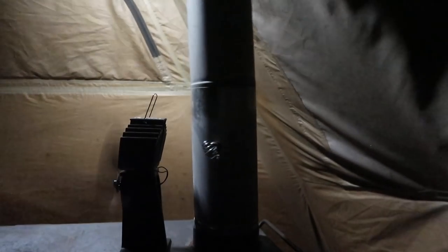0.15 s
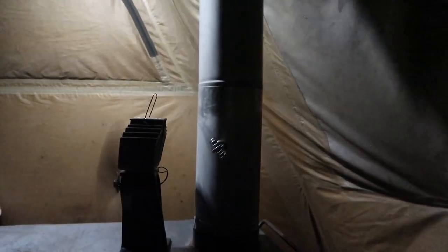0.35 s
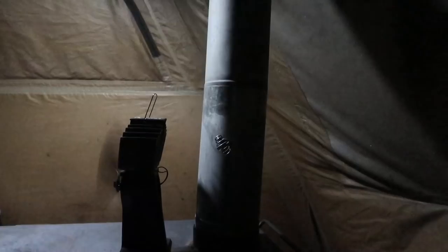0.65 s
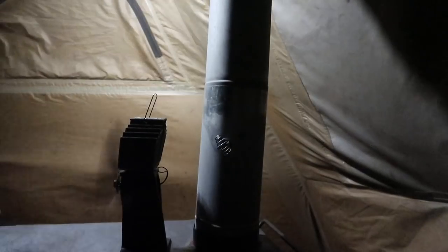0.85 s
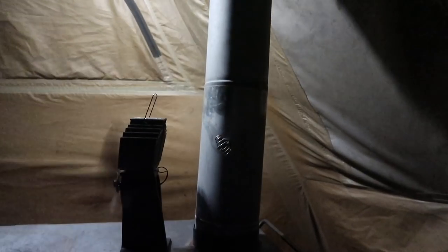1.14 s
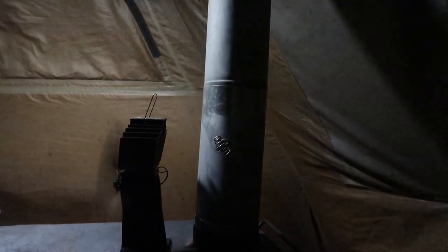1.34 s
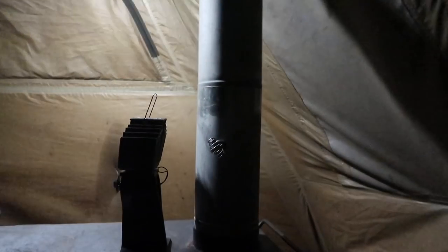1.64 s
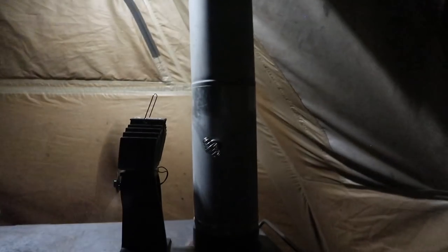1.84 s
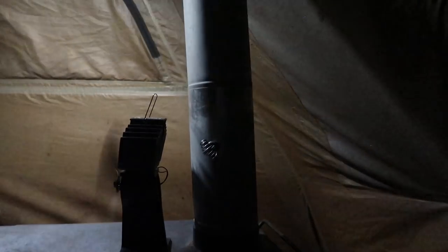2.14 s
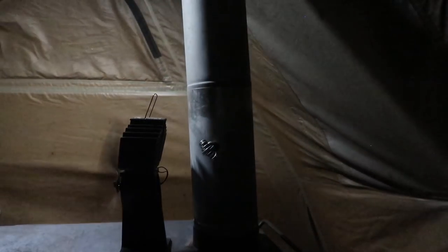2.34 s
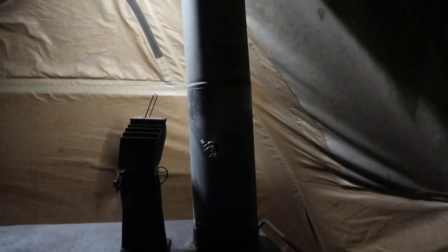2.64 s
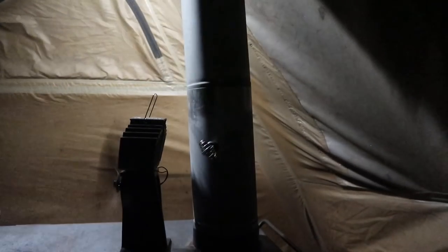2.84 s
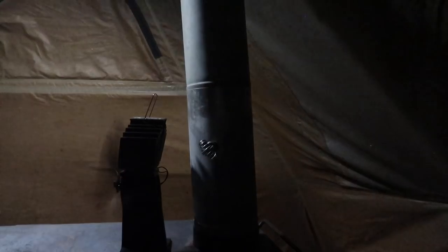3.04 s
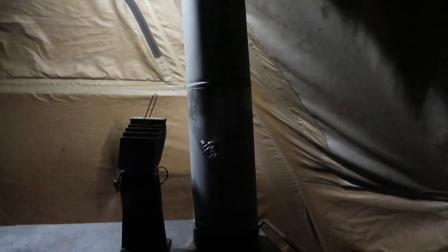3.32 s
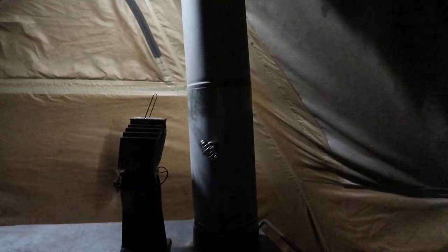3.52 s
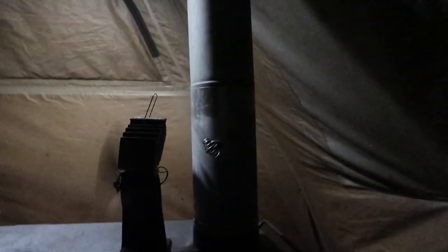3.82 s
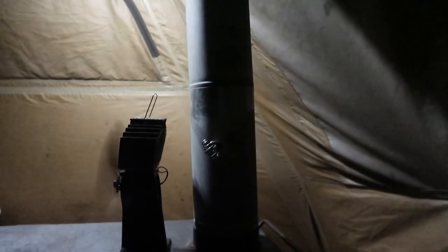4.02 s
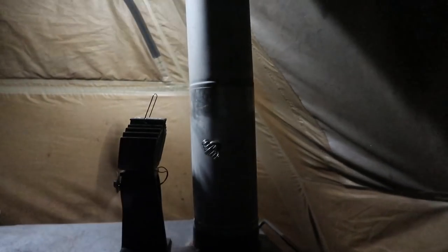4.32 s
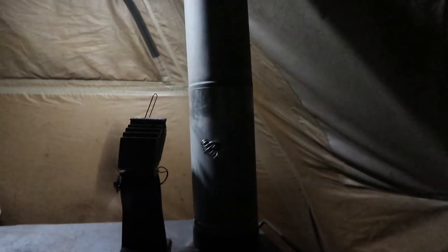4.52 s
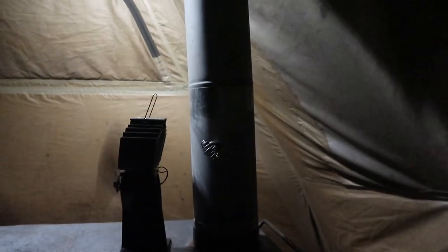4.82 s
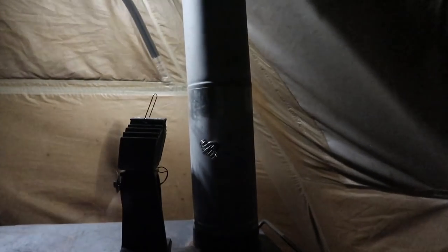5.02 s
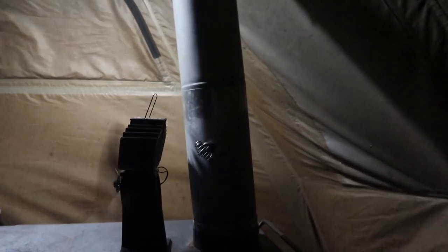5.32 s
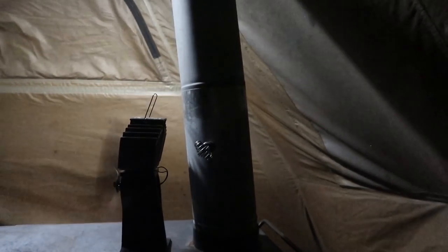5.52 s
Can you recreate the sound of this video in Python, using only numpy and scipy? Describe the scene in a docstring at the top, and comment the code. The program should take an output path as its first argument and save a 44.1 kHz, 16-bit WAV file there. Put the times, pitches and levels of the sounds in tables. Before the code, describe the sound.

Strong gusts shake slack tent cloth: dense flapping and rustling, a lull, then a long rebuilding roar of flutter over soft snow hiss.

```python
"""Canvas tent walls shake in a winter gale, heard from inside.
Countless small slaps make a dense flutter and rustle, and filtered noise makes a low heaving of the air.
Bursts and short swinging tones make slack panels crumple, tick, snap and whump taut.
Ringing modes with a gritty scrape make small metal fittings jingle.
Dense random grains make blown snow hiss over the cloth."""
import sys
import numpy as np
from scipy import signal
from scipy.fft import rfft, irfft, next_fast_len
from scipy.io import wavfile

SR = 44100
rng = np.random.default_rng(int(sys.argv[2]) if len(sys.argv) > 2 else 0)


def dump(signal):
    """Clip the signal to [-1, 1] and save it as 16-bit WAV at the path in sys.argv[1]."""
    limited = np.clip(np.atleast_2d(signal).T, -1, 1)
    pcm = np.round(limited * 32767).astype(np.int16)
    wavfile.write(sys.argv[1], SR, pcm)


N = 249606   # length in samples

# Surges of wind that shake the walls harder: crest_s [s], length_s [s], extra_flutter_db [dB],
# extra_rustle_db [dB], panel_hz [Hz] (resonance of the panel shaken most)
GUST_SURGES = [(0.08, 0.12, 1.5, 2.5, 231), (0.173, 0.17, 6.5, 5, 690), (0.257, 0.1, 2.5, 7.5, 1500),
               (0.422, 0.036, -0.5, 5.5, 1700), (0.843, 0.091, 3, 6, 450), (.97, .081, 1, 5.5, 1700),
               (1.292, .16, -2, 5, 1700), (1.408, 0.25, -3, 4, 1400), (1.523, 0.12, 3.5, 5.5, 181),
               (1.908, 0.15, -1, 5.5, 1750), (2.638, 0.22, 2, 1.5, 182), (2.863, 0.31, 6.5, 1, 300),
               (3.028, 0.11, 10, 2, 660), (3.099, 0.15, 6, 5.5, 214), (3.232, 0.11, 8.5, 1.5, 215),
               (3.643, 0.15, 9.5, 3.5, 307), (3.699, .085, 6, 5.5, 296), (3.779, 0.19, 8, 6, 690),
               (3.972, 0.12, 3.5, 3, 760), (4.053, 0.17, 1, 6, 1700), (4.683, 0.22, 5.5, -1.5, 710),
               (4.912, 0.067, 3.5, 3, 340), (5.046, 0.092, 3, 2, 180), (5.097, 0.08, 5.5, -1.5, 285),
               (5.156, 0.12, 9, 3, 310), (5.256, 0.2, 6, 0, 175), (5.468, 0.16, 6, 4, 272),
               (5.577, .17, 8.5, 4.5, 800)]


def from_db(db):
    """Turn decibels into a gain."""
    return 10 ** (np.asarray(db) / 20)


def rms_one(x):
    """Scale a sound so that its rms strength is 1."""
    return x / np.sqrt(np.mean(x ** 2) + 1e-20)


def in_time(rows):
    """Draw a (time, level) curve as one level for every sample."""
    times_s, levels_db = np.transpose(rows)
    return np.interp(np.arange(N) / SR, times_s, levels_db)


def drift(rate_hz):
    """Smooth random wandering around zero with spread 1, changing about rate_hz times a second."""
    step = 40   # samples between the slow random values
    r = np.exp(-2 * np.pi * rate_hz * step / SR)
    noise = rng.standard_normal(N // step + 2002)
    slow = signal.lfilter([1], [1, -2 * r, r * r], noise)[2000:]   # skip the filter's start
    return np.interp(np.arange(N) / step, np.arange(len(slow)), rms_one(slow))


def colour(x, spectrum):
    """Filter a sound to the given (Hz, dB) response without sounding ahead of time (minimum phase)."""
    size = 2 * next_fast_len(N // 2 + SR // 10)
    hz, db = np.transpose(spectrum)
    bins_hz = np.maximum(np.arange(size // 2 + 1) * SR / size, 1)
    gains = from_db(np.interp(np.log(bins_hz), np.log(hz), db))
    # folding the cepstrum forward in time gives the minimum phase
    cepstrum = irfft(np.log(gains))
    cepstrum[1:size // 2] *= 2
    cepstrum[size // 2 + 1:] = 0
    response = np.exp(rfft(cepstrum))
    return irfft(rfft(x, size) * response)[:N]


def dying(fade_s):
    """A quarter of a second of an envelope that falls by 60 dB in fade_s seconds."""
    return from_db(-60 * np.arange(SR // 4) / (SR * fade_s))


def add(track, s, sound):
    """Mix a sound into a track at s seconds."""
    start = round(s * SR)
    track[start:start + len(sound)] += sound[:N - start]


def swell(crest_s, length_s):
    """A smooth rise to 1 at the crest and a smooth fall, at every sample."""
    rise_share = 0.47   # part of the length spent rising
    start_s = crest_s - rise_share * length_s
    end_s = crest_s + (1 - rise_share) * length_s
    ramp = np.interp(np.arange(N) / SR, [start_s, crest_s, end_s], [0, 1, 0])
    return np.sin(np.pi / 2 * ramp) ** 2


def swells(rows):
    """Add up many swells, giving one track in dB for each level column."""
    return sum(np.outer(extra_db, swell(crest_s, length_s)) for crest_s, length_s, *extra_db in rows)


def slaps(per_s, spread_db):
    """Random pushes of uneven size and either sign, about per_s a second; rms 1."""
    sizes = from_db(spread_db * np.minimum(rng.exponential(1, N), 3.5)) * rng.choice([-1, 1], N)
    happens = rng.random(N) < per_s / SR
    return rms_one(sizes * happens / np.sqrt(per_s))


def patches(pushes, low_hz, high_hz, cycles, count):
    """Each push sets one of many cloth patches ringing, falling 60 dB in some cycles of its pitch; rms 1."""
    out, dealt = np.zeros(N), rng.integers(0, count, N)
    for k, hz in enumerate(np.geomspace(low_hz, high_hz, count)):
        r, w = from_db(-60 * hz / (cycles * SR)), 2 * np.pi * hz / SR
        pushed = pushes * (dealt == k) + 1e-18
        ringing = signal.lfilter([1, 0, -1], [1, -2 * r * np.cos(w), r * r], pushed)
        out += rms_one(ringing) * np.sqrt(hz)   # equal power per Hz
    return rms_one(out)


def walls(flutter_db, rustle_db):
    """Ripples run through the cloth as countless small slaps, more of them in a stronger wind."""
    # Tone of the flutter: pitch_hz [Hz], level_db [relative dB per Hz]
    flutter_tone = [(50, -13), (120, -15.5), (185, 1.5), (270, 0.5), (340, -3), (440, 2), (520, -2),
                    (600, -1.5), (750, -5), (950, -7), (1400, -13.5), (2500, -27), (5000, -52.5),
                    (15000, -88)]
    # Tone of the rustle: pitch_hz [Hz], level_db [relative dB per Hz]
    rustle_tone = [(300, -16.5), (800, 4.5), (1400, 2), (2000, -1), (2900, -7), (3800, -14), (5500, -20.5),
                   (8000, -28.5), (11000, -35.5), (15000, -65)]
    pace = from_db(.35 * (flutter_db - np.max(flutter_db)))
    flapping = drift(31.0)   # quick, uneven rises and dips in level

    folds = slaps(850 * pace, spread_db=-1.0)
    panel_slaps = slaps(1100 * pace, spread_db=1.5)
    panels = patches(panel_slaps, low_hz=158.4, high_hz=1558, cycles=38.0, count=24)
    dry_slaps = rms_one(colour(folds + .5 * rng.standard_normal(N), flutter_tone))
    ringing = rms_one(colour(panels, flutter_tone))
    body = shaken_panels(rms_one(dry_slaps + 0.73 * ringing))

    crease_slaps = slaps(1300 * pace, spread_db=2.5)
    creases = patches(crease_slaps, low_hz=900, high_hz=5000, cycles=72, count=20)
    rubbing = 1.56 * rng.standard_normal(N)
    rustle = rms_one(colour(0.95 * folds + 0.68 * creases + rubbing, rustle_tone))

    moving_flutter_db = flutter_db + 1.2 * flapping
    moving_rustle_db = rustle_db + 1.2 * flapping + 0.1 * drift(46)
    return body * from_db(moving_flutter_db) + rustle * from_db(moving_rustle_db)


def shaken_panels(flutter):
    """Each surge shakes one panel most, so the resonance in the flutter moves from surge to surge."""
    gain, width_octaves = 0.55, 0.24
    edges = 2 ** (width_octaves * np.array([-.5, .5]))
    resonance = np.zeros(N)
    for crest_s, length_s, _, _, panel_hz in GUST_SURGES:
        band = signal.butter(1, panel_hz * edges, "band", fs=SR, output="sos")
        resonance += signal.sosfilt(band, flutter) * swell(crest_s, length_s)
    return flutter + gain * resonance


def heaving(heave_db):
    """Whole walls pump the air in the tent, heard as low noise that is deeper in the later gusts."""
    # Tone of the pumped air: pitch_hz [Hz], level_db [relative dB per Hz]
    heave_tone = [(12, -18), (25, -5), (45, -1.5), (85, 2.5), (130, 0), (200, -4.5), (400, -15),
                  (1000, -99)]
    # Level of the deepest part over time: time_s [s], extra_db [dB]
    deep_curve = [(0, -8), (.8, -5), (1.6, -1), (3.0, 0.5), (4.2, 0.5), (4.7, 3), (5.66, 0.5)]
    air = rms_one(colour(rng.standard_normal(N), heave_tone))
    deep = signal.sosfilt(signal.butter(1, 50, fs=SR, output="sos"), air)   # below about 50 Hz
    extra_deep = deep * (from_db(in_time(deep_curve)) - 1)
    return (air + extra_deep) * from_db(heave_db)


def snaps():
    """A fold cracks open as a very short noise burst and the cloth around it shivers on."""
    # Folds cracking open: start_s [s], level_db [relative dB], low_hz [Hz], high_hz [Hz],
    # fade_s [s for the shiver to fall 60 dB]
    snap_rows = [(.547, -28, 400, 2500, 0.12), (.5685, -8, 1390, 8050, 0.026),
                 (.5907, -12, 1410, 5000, 0.025), (.6227, -13.5, 2000, 8000, .05),
                 (.650, -13, 1500, 5000, 0.026), (1.078, -22, 900, 5000, 0.09),
                 (1.351, -26.5, 610, 1700, 0.04), (1.613, -25, 4700, 6100, 0.048),
                 (1.655, -31, 497, 1710, 0.062), (1.7445, -17.5, 2000, 6200, 0.065),
                 (1.947, -0.5, 3630, 7600, 0.014), (1.950, -12, 1100, 3250, 0.032),
                 (1.971, -18.5, 696, 2430, 0.044), (5.628, -22, 2800, 6800, 0.027)]
    # Tone filter of all cracks: pitch_hz [Hz], gain_db [dB]
    crack_tone = [(100, -73), (500, 26), (3000, 4.5), (4500, -7), (6500, -3), (9000, -9.5), (11500, -7.5),
                  (15000, -36)]
    out = np.zeros(N)
    for start_s, level_db, low_hz, high_hz, fade_s in snap_rows:
        envelope = dying(.024) + .5 * dying(fade_s)   # the crack, then the shiver
        band = signal.butter(2, [low_hz, high_hz], "band", fs=SR, output="sos")
        # soft cloth makes no sharper edge
        softness = signal.butter(4, min(2.9 * high_hz, SR / 2.2), fs=SR, output="sos")
        noise = rng.choice([-1, 1], len(envelope)) * envelope
        burst = rms_one(signal.sosfilt(np.vstack([band, softness]), noise))
        add(out, start_s, from_db(level_db - 9.0) * burst * np.sqrt(np.mean(envelope ** 2)))
    return colour(out, crack_tone)


def crumples():
    """Slack cloth gathers and lets go in dry cracks and briefly ringing creases that swell and fade."""
    # Bouts of crumpling: crest_s [s], level_db [dB at the crest], rise_s [s],
    # fade_s [s to fall 60 dB]
    crumple_rows = [(.425, -28, 0.042, 0.069), (.575, -24, 0.051, 0.54), (1.08, -36.5, 0.047, 0.1),
                    (1.753, -23.5, 0.013, 0.059), (1.953, -27, 0.051, 0.51), (2.065, -50, 0.025, 0.33),
                    (3.94, -28, .012, 0.25)]
    # Tone of the crackle: pitch_hz [Hz], level_db [relative dB per Hz]
    crumple_tone = [(200, -24), (500, -2), (1000, 2.5), (3000, -1.5), (4500, -8), (7000, -13.5),
                    (10000, -20), (14000, -39)]
    t, envelope = np.arange(N) / SR, np.zeros(N)
    for crest_s, level_db, rise_s, fade_s in crumple_rows:
        rise = np.interp(t, [crest_s - rise_s, crest_s], [0, 1])
        fall_db = 60 * np.maximum(t - crest_s, 0) / fade_s
        envelope += rise * from_db(level_db - fall_db)
    creases = patches(slaps(900, spread_db=3.0), low_hz=500, high_hz=6000, cycles=13, count=18)
    cracks = slaps(910, spread_db=3.5)
    crackle = (cracks + 0.52 * creases) * from_db(2.0 * drift(90))   # in uneven bunches
    return rms_one(colour(crackle, crumple_tone)) * envelope


def whumps(sag, rough, soft_hz=2500):
    """A panel pulled taut swings unevenly, then dies and sinks in pitch as the pull eases."""
    # Panels jerking taut: start_s [s], level_db [relative dB], pitch_hz [Hz],
    # hold_s [s at full strength], fade_s [s to fall 60 dB]
    whump_rows = [(0.4, -17, 447, 0.0027, 0.033), (.546, -16, 426, .003, 0.023),
                  (0.558, -11, 410, 0.0022, 0.041), (0.634, -15.5, 564, 0.0073, 0.05),
                  (0.6502, 0, 690, 0.002, 0.003), (0.658, -13.5, 560, 0.012, .05),
                  (0.954, -23, 524, 0.0016, 0.041), (1.074, -17.5, 388, .002, 0.086),
                  (1.35, -17, 594, 0.0015, 0.021), (1.481, -14, 610, 0.0027, 0.046),
                  (1.743, -13.5, 500, 0.0016, 0.022), (1.765, -11.5, 460, 0.0025, 0.038),
                  (1.95, -9.5, 575, .002, 0.032), (1.967, -8, 595, 0.0077, 0.022),
                  (2.98, -19.5, 475, .002, .04), (3.008, -17, 520, 0.0018, 0.024),
                  (3.221, -5, 414, 0.00061, .012), (3.935, -17, 757, 0.0049, 0.046),
                  (4.195, -18, 590, .002, 0.057), (4.627, -10, 540, .003, .04),
                  (4.895, -16, 380, .002, .04), (5.564, -14, 563, 0.0055, 0.042)]
    out = np.zeros(N)
    for start_s, level_db, pitch_hz, hold_s, fade_s in whump_rows:
        envelope = np.concatenate([np.ones(round(hold_s * SR)), dying(fade_s)])
        slow = signal.butter(2, pitch_hz, fs=SR, output="sos")
        shiver = rms_one(signal.sosfilt(slow, rng.standard_normal(SR // 2)))[:len(envelope)]
        moving_hz = pitch_hz * (1 + sag * (envelope - .5) + rough * shiver)
        swing = np.sin(2 * np.pi * np.cumsum(moving_hz) / SR)
        add(out, start_s, from_db(level_db - 1.5) * envelope * swing)
    return signal.sosfilt(signal.butter(2, soft_hz, fs=SR, output="sos"), out)


def ticks(rustle_db):
    """A stiff crease pops through: one pop and a very short shiver in a band with steep edges."""
    # Single dry ticks: start_s [s], level_db [relative dB], low_hz [Hz], high_hz [Hz]
    tick_rows = [(0.525, -20, 2040, 2750), (1.847, -17.5, 1500, 2970), (1.882, -9, 1010, 2640),
                 (1.897, -14, 2210, 3320), (1.924, -17, 2600, 3650), (2.279, -25, 700, 3300),
                 (2.827, -14, 900, 4320), (3.1853, -12.5, 1610, 4200), (3.220, -9.5, 900, 3060),
                 (4.7283, -17.5, 1900, 4260), (5.453, -16.5, 1500, 3000)]
    out, envelope = np.zeros(N), dying(.018)[:SR // 16]
    pop = 7.3 * signal.unit_impulse(len(envelope))   # over the shiver that follows it
    for start_s, level_db, low_hz, high_hz in tick_rows + stray_ticks(rustle_db):
        band = signal.butter(8, [low_hz, high_hz], "band", fs=SR, output="sos")
        dulling = signal.butter(1, 1.5 * low_hz, fs=SR, output="sos")
        push = rng.choice([-1, 1], len(envelope)) * envelope + pop
        burst = rms_one(signal.sosfilt(np.vstack([band, dulling]), push))
        add(out, start_s, from_db(level_db - 4.5) * burst * np.sqrt(np.mean(envelope ** 2)))
    return out


def stray_ticks(rustle_db):
    """Small creases pop at random moments, harder when the cloth rustles harder; rows as in ticks()."""
    count = 110
    moments = rng.integers(0, N, count)
    chance = np.clip(rng.standard_normal((count, 2)), -2, 2)
    octaves = 0.485 * chance[:, 1]   # scatter in pitch
    # scattered in level, and slightly louder with pitch (2 dB per octave)
    levels_db = rustle_db[moments] - 2 - 2 * chance[:, 0] + 2 * octaves
    lows_hz = 1500 * 2 ** octaves
    return [(at / SR, db, hz, 1.99 * hz) for at, db, hz in zip(moments, levels_db, lows_hz)]


def fittings(scatter_db=3):
    """Each knock scrapes grittily and rings the metal, some modes most, with new strengths at each ear."""
    # Ringing modes of the metal: pitch_hz [Hz], level_db [relative dB], fade_s [s to fall 60 dB]
    metal_modes = [(2820, -15, .07), (3460, -30, 0.07), (4060, -14, .06), (6000, -16, .06),
                   (6370, -21, .06), (6800, -19, 0.053), (7080, -17, 0.029), (7640, -19, 0.053),
                   (7900, -17, .04), (10600, -29, .05)]
    # Knocks: start_s [s], scrape_db [relative dB], ring_db [relative dB],
    # struck_hz [Hz around which modes ring hardest]
    knock_rows = [(.45, -36, -34, 6900), (0.559, -31, -25, 6800), (.570, -26, -22, 6300),
                  (0.59, -21, -19, 6750), (.624, -35, -27, 6750), (0.651, -21, -29, 8000),
                  (.676, -36, -29, 4060), (.6994, -45, -30, 6950), (.727, -43, -34, 6500),
                  (1.948, -28.5, -29, 7300), (2.0088, -32.5, -23, 7100), (2.0287, -25, -29, 7700),
                  (2.046, -35, -37, 7100), (2.0596, -28, -32, 3450), (2.0855, -32, -39, 7300),
                  (3.951, -37, -25, 6800), (3.973, -37.5, -30, 6940)]
    # Tone filter of metal scraping on metal and cloth: pitch_hz [Hz], gain_db [dB]
    scrape_tone = [(1500, -41), (3300, 2), (4600, 3), (5500, -11), (7200, -2), (8300, -8), (10500, -17),
                   (14000, -38), (15500, -45)]
    focus_peak_db, focus_octaves = 14.5, .07   # how much harder those modes ring, and how far around
    t = np.arange(SR // 4) / SR
    scrape_fade = dying(0.026) + 0.38 * dying(0.22)   # a short scrape with a weaker tail
    ears = []
    for _ in range(2):
        ring, scrape = np.zeros(N), np.zeros(N)
        for start_s, scrape_db, ring_db, struck_hz in knock_rows:
            for hz, mode_db, fade_s in metal_modes:
                size, phase = rng.standard_normal(2)
                distance = np.log2(hz / struck_hz) / focus_octaves
                focus_db = focus_peak_db * np.exp(-distance ** 2)
                strength = from_db(ring_db + mode_db + focus_db + scatter_db * size)
                envelope = strength * (dying(fade_s) - dying(0.0038))   # the second part softens the start
                add(ring, start_s, envelope * np.sin(2 * np.pi * hz * t + phase))
            add(scrape, start_s, from_db(scrape_db) * scrape_fade)
        grit = slaps(3500, spread_db=2.0)
        ears.append(ring + colour(scrape * grit, scrape_tone))
    return np.array(ears)


def snow(snow_db, centre_ceiling_db=-46):
    """Fine grains sweep the cloth: an even hiss ahead, and a wide one with brief, strong rises."""
    # Tone filter of the hiss ahead: pitch_hz [Hz], gain_db [dB]
    centre_tone = [(1000, -36), (3000, 8), (5000, 6), (8000, -0.5), (11000, -5), (13000, -16), (15000, -55)]
    # Tone filter of the wide hiss: pitch_hz [Hz], gain_db [dB]
    wide_tone = [(1000, -47), (2400, 2), (3400, 5.5), (5000, 3), (8000, 2), (11000, 0.5), (13500, -3),
                 (15500, -15)]
    centre_db = np.minimum(snow_db, centre_ceiling_db) + 4.0
    centre = colour(slaps(30000, spread_db=5.0), centre_tone) * from_db(centre_db)
    wide = colour(slaps(30000, spread_db=-5.0), wide_tone) * from_db(snow_db + 3.5)
    return centre + wide * [[1], [-1]]   # opposite signs at the two ears


def reflections(x, fade_s, first_s):
    """Short, dense echoes between the cloth walls, as a fading noise tail of unit power."""
    tail = rng.standard_normal(SR // 4) * dying(fade_s)
    tail[:round(first_s * SR)] = 0
    return signal.fftconvolve(x, tail / np.linalg.norm(tail))[:N]


def spread(cloth):
    """The nearest walls reach the two ears unequally, and the cloth leans a little to the right."""
    # How much of the cloth's sound differs between the ears: pitch_hz [Hz], side_db [dB]
    width_curve = [(50, -46), (100, -82), (250, -26), (450, -24.5), (800, -24), (1300, -27.5), (2500, -18),
                   (5000, -5), (10000, 3)]
    side = colour(reflections(cloth, fade_s=0.045, first_s=0.000827), width_curve)
    above_bass = signal.sosfilt(signal.butter(1, 340, "high", fs=SR, output="sos"), cloth)
    side = side - .04 * above_bass   # quieter at the left, louder at the right
    return cloth + side * [[1], [-1]]


def scene():
    """One wind drives cloth, air and snow; the cloth lies a little right of the middle, snow all around."""
    # Strength of the wind, as the basic level of the flutter: time_s [s], level_db [dB]
    wind_curve = [(0, -19), (.38, -21.5), (.48, -27), (.65, -24), (.74, -34.5), (1.2, -31), (1.35, -26),
                  (1.66, -27.5), (1.96, -23.5), (2.07, -38), (2.36, -38), (2.76, -33), (3.08, -28.5),
                  (3.5, -25), (3.82, -22.5), (4.27, -28), (4.52, -24), (5.66, -23)]
    # A whole wall bellies in and out, or is held still: crest_s [s], length_s [s],
    # extra_heave_db [dB], extra_flutter_db [dB]
    billow_rows = [(.25, .48, -1, 0), (.64, 0.08, 0.5, -7.5), (.78, 0.32, 1, -1), (1.17, 0.056, 12, 0.5),
                   (1.51, 0.098, 9.5, -0.5), (1.97, 0.31, -9.5, 3.5), (3.41, 0.74, 4, -1),
                   (3.65, .15, 1.5, -1), (4.05, 0.12, 7, 1), (4.69, .13, 4, 2), (5.17, 0.25, 3, -0.5)]
    # Short rises of the hiss, strongest in the wide part: crest_s [s], length_s [s], extra_hiss_db [dB]
    hiss_rise_rows = [(1.5, 0.22, 6.5), (3.44, 0.074, 13), (3.66, 0.03, 18), (4.2, 0.67, 3),
                      (4.73, 0.051, 9.5), (5.63, 0.017, 17)]
    wind_db = in_time(wind_curve)
    force_db = wind_db + 25   # above or below a moderate wind
    surge_db, extra_rustle_db = swells([row[:-1] for row in GUST_SURGES])
    billow_db, slack_db = swells(billow_rows)
    hiss_rise_db, = swells(hiss_rise_rows)

    # each follows the wind by its own number of dB per dB
    flutter_db = wind_db + surge_db + slack_db
    rustle_db = -31 + 1.12 * force_db + extra_rustle_db
    heave_db = -26.5 + 0.95 * force_db + 0.17 * surge_db + billow_db
    # the steady hiss stops growing at a moderate wind
    snow_db = np.minimum(-50.5 + 0.85 * force_db, -50.5) + hiss_rise_db

    blows = snaps() + crumples() + whumps(sag=0.12, rough=0.18)
    echoes = from_db(-10) * reflections(blows, fade_s=0.089, first_s=0.00542)
    cloth = walls(flutter_db, rustle_db) + ticks(rustle_db) + blows + echoes
    return spread(cloth) + heaving(heave_db) + fittings() + snow(snow_db)


def record(dry):
    """Round the highest peaks and cut the treble steeply above 15200 Hz."""
    rounded = dry / (1 + dry ** 6) ** (1 / 6)
    return signal.sosfilt(signal.ellip(10, .1, 90, 15200, fs=SR, output="sos"), rounded)


dry = scene()
out = record(dry)
dump(out)
```